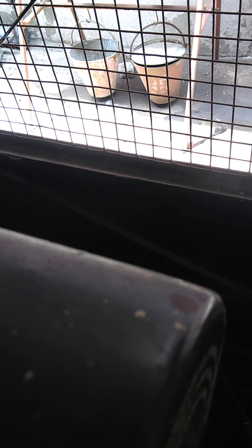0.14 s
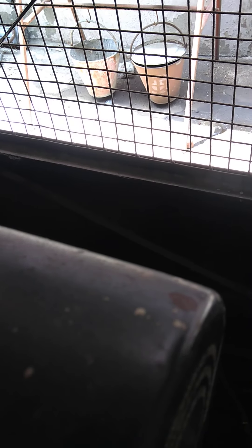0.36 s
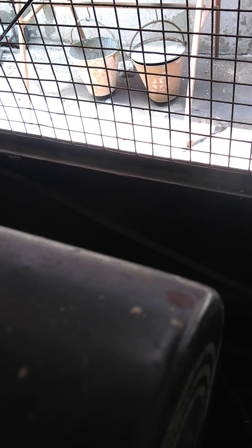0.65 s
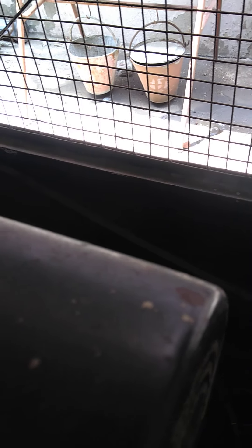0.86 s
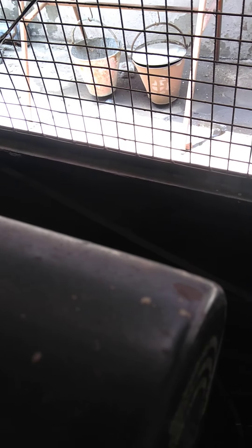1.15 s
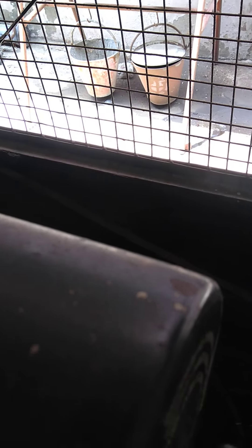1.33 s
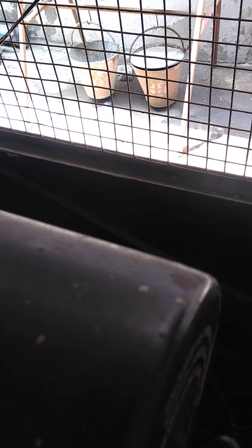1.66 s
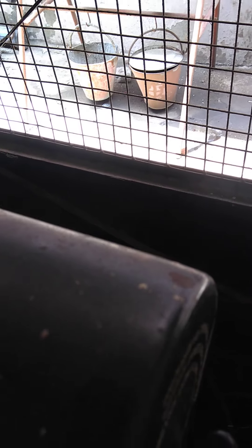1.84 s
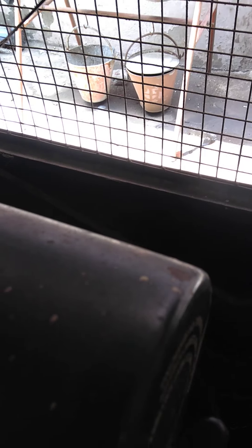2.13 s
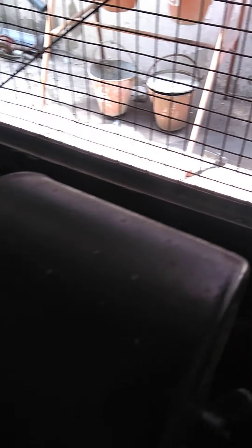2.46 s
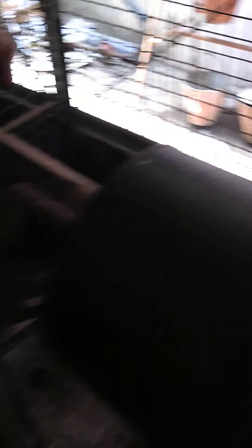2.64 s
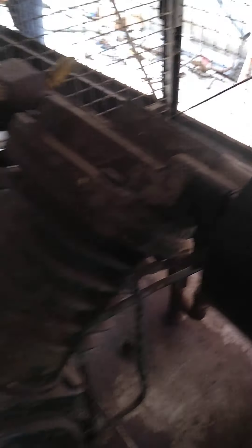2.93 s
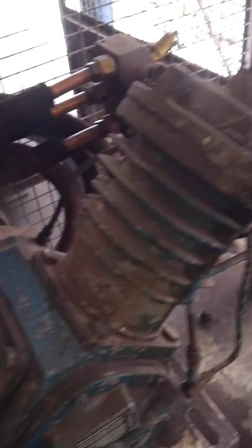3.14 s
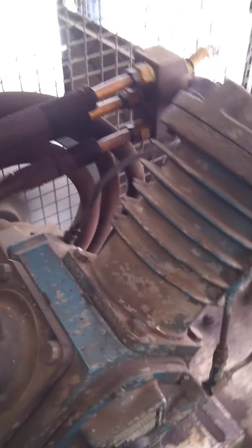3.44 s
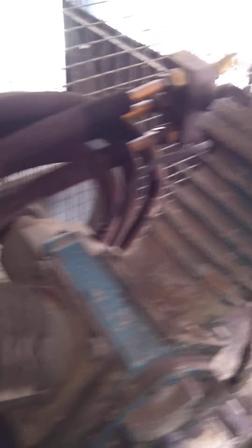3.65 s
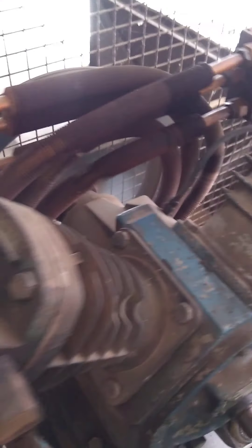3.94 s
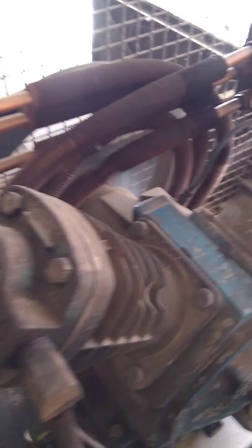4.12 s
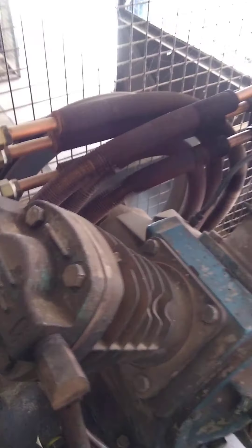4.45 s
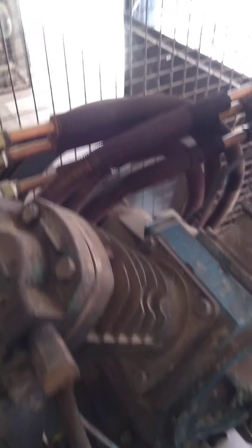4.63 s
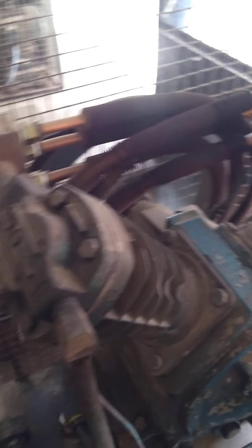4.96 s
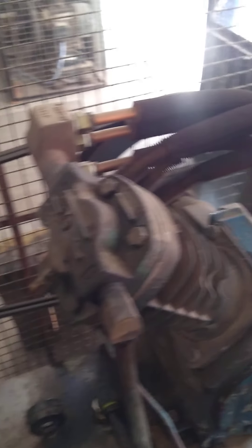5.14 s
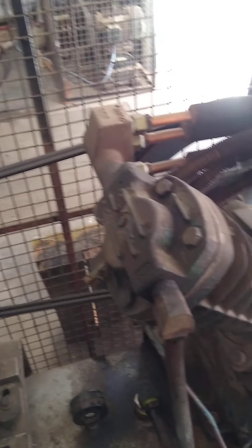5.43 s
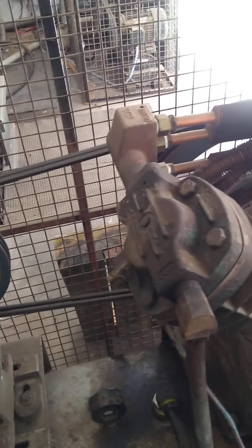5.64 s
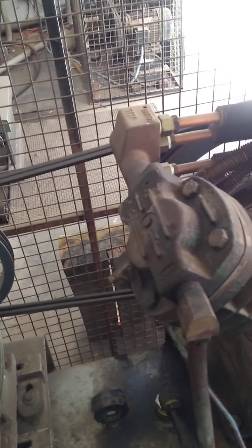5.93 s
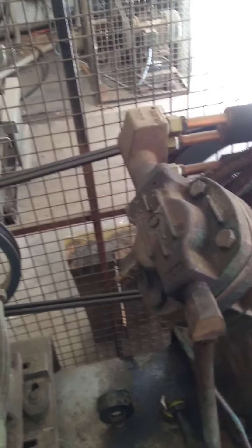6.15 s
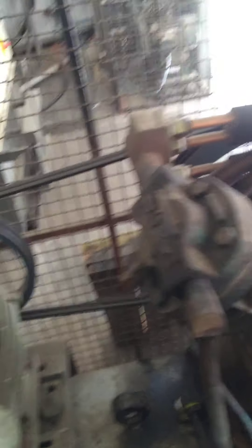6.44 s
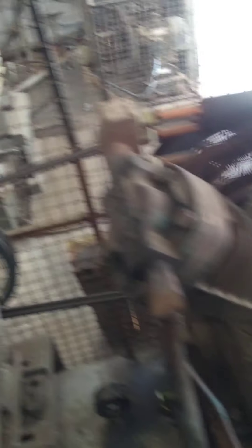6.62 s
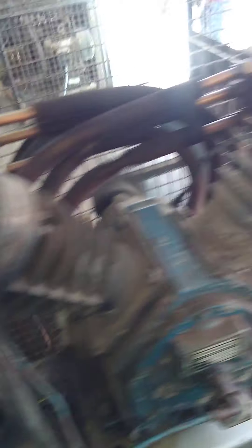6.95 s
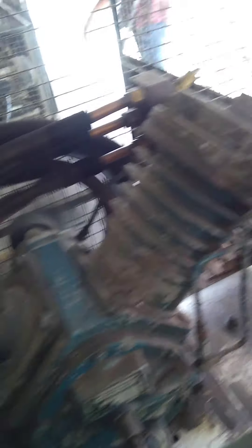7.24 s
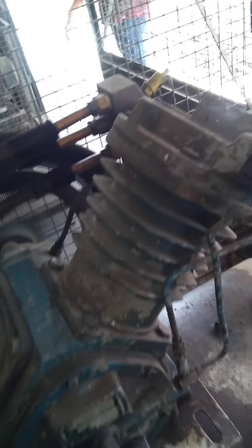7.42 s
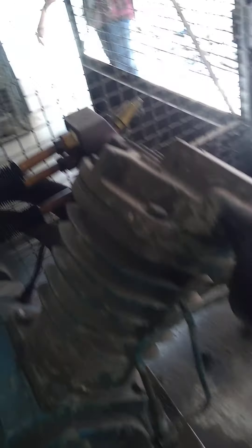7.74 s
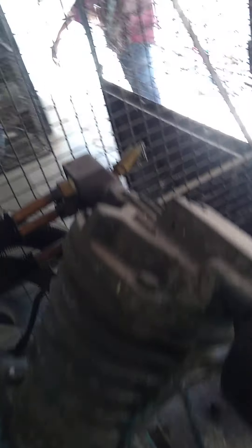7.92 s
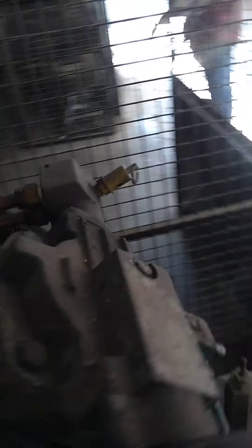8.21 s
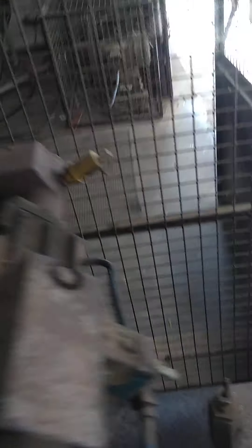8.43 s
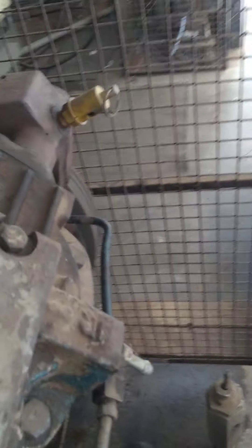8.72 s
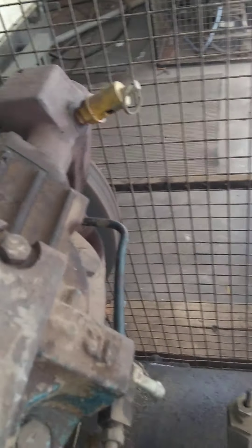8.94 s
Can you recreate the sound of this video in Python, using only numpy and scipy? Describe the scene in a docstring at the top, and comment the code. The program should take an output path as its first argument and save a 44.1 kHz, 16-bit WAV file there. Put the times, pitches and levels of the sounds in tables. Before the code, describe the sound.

An air compressor is already running and never stops or changes speed: a dense, rapid throb of almost sixteen turns a second, heard very close in a workshop. From 0 to about 2.5 seconds the microphone is by the motor: bassy thudding, softer knocks, only faint air hiss and a barely audible thin electrical whine. Around 2.5 to 4 seconds it moves past the first cylinder, and hollow metallic ringing, valve clatter and breathy pulses of air come forward. From 4 to 6.5 seconds, by the second cylinder, it is loudest and harshest, with hard knocking, fuller rushing air, small spits and a very high fluttering squeak. From 6.5 to 8.3 seconds it swings back, the clatter and hiss receding. After about 8.5 seconds the cylinder head shades the sound, dulling the knocks, and the low throb continues to the end at about 9 seconds.

```python
"""A steady throb of thuds and knocks, near 16 a second: a belt-driven twin-cylinder air compressor in a workshop.
Each turn brings two intake puffs and a head knock (ringing resonances summed as crank harmonics), valve clatter
and taps (noise bursts), a swell of rushing air with a spit (shaped noise) and a squeak (a wavering sine).
A thin sine whine marks the motor. The microphone starts beside the motor, is carried past the first cylinder
to the second, and back; at the end the cylinder head shades the sound."""
import sys
import numpy as np
from scipy import signal
from scipy.fft import rfft, irfft, next_fast_len
from scipy.io import wavfile
from scipy.ndimage import uniform_filter1d, map_coordinates

SR = 44100
rng = np.random.default_rng(int(sys.argv[2]) if len(sys.argv) > 2 else 0)


def master(y):
    """Save y as 16-bit WAV."""
    cut = np.clip(np.atleast_2d(y).T, -1, 1)
    pcm = np.round(cut * 32767)  # scale
    wavfile.write(sys.argv[1], SR, pcm.astype(np.int16))


N = 400428

# "place" is the microphone's position: 0 by the motor, 1 at the first cylinder, 2 at the second
# spectra give relative level per Hz; noise() sets the overall rms

# body rumble under the thud: f/Hz, level/dB
RUMBLE_SPECTRUM = [(20, -23), (45, -36), (80, -8), (150, -9), (260, -5), (450, -3), (600, -9.5), (900, -31)]
# rattle under the knock: f/Hz, level/dB
RATTLE_SPECTRUM = [(300, -16), (500, -4.5), (800, -3), (950, -27), (1300, -37)]
# loose ringing of the castings under the strokes: f/Hz, level/dB
CASTINGS_SPECTRUM = [(380, -8), (430, 6), (450, 3), (500, -2), (570, -3), (620, 4), (690, -3), (750, 3),
                     (830, -5)]
RUMBLE_MOTOR_DB, RUMBLE_SECOND_DB = -13, -12  # against the thud
RATTLE_DB = -9.5  # against the knock
CASTINGS_DB = -25.5


def pistons(turns, place, thud_db, knock_db, left_db):
    """Intake puffs and head knocks, with a little rumble, rattle and ringing that never repeats."""
    thud, knock = beat(turns, place)
    # the body shakes hardest just after the main stroke
    shake = swell(turns, centre=.22, width=.15, depth_db=5)
    rumble_db = np.interp(place, [0, 2], [RUMBLE_MOTOR_DB, RUMBLE_SECOND_DB])
    thud = thud + from_db(rumble_db) * noise(RUMBLE_SPECTRUM) * shake
    knock = knock + from_db(RATTLE_DB) * noise(RATTLE_SPECTRUM) * shake
    # silent right by the motor, full from the first cylinder on
    ringing = from_db(CASTINGS_DB) * np.minimum(place, 1) * noise(CASTINGS_SPECTRUM) * shake
    low = panned(thud * from_db(thud_db - 1.0) + ringing, left_db + 0.3)
    high = panned(knock, left_db + 1.5) * from_db(knock_db - 1.37)
    return low + high


# stereo width of the beat: f/Hz, side minus mid level/dB
BEAT_WIDTH = [(60, -15), (100, 10.5), (160, -6), (260, -7.5), (500, -6.5), (950, -12)]


def beat(turns, place):
    """The thud (below 500 Hz) and knock (above), summed from each turn's harmonics, each band at rms 1."""
    turn_starts = np.searchsorted(turns, np.arange(int(turns[-1]) + 2))
    at = np.minimum(turn_starts, N - 1)
    hidden = shade()[at]
    # mix of the three places, plus a fourth: behind the head
    by_place = [np.maximum(1 - abs(place[at] - k), 0) * (1 - hidden) for k in range(3)]
    shares = np.transpose(by_place + [hidden])
    multiple, mid = turn_harmonics(shares, at / SR)
    hz = multiple * TURNS_PER_S
    side_phase = np.exp(.7j * rng.standard_normal(len(hz)))
    side = 1j * mid * from_db(at_hz(BEAT_WIDTH, hz)) * side_phase
    cycle = np.exp(2j * np.pi * np.outer(multiple, np.linspace(0, 1, turn_size() + 1)))
    parts = []
    for band in (hz < 500, hz >= 500):
        power = uniform_filter1d(np.sum(abs(mid * band) ** 2, axis=1) / 2, size=4)
        waves = (stereo(mid, side) * band / np.sqrt(power)[:, None] @ cycle).real
        # each turn's waveform glides into the next
        position = [turns, turns % 1 * turn_size()]
        parts.append([map_coordinates(w, position, order=1) for w in waves])
    return np.array(parts)


# standing-wave loud spots the microphone passes: t/s, 1/e half length/s, f/Hz, lift level/dB
LOUD_SPOTS_PASSED = [(4.003, 0.73, 786, 14.5), (4.093, 0.24, 533, 14.5), (6.253, 0.35, 437, 4.5),
                     (6.893, 0.23, 648, 11.5)]
# shifting reflections against the direct beat: f/Hz, share
SHIFTING_REFLECTIONS = [(200, .09), (300, .11), (450, .18), (1000, .16)]
# steady reflections against the direct beat: share at motor, first cylinder, second, behind the head
STEADY_REFLECTIONS = [0.15, 0.5, 0.45, 0.08]
# ringing-on of pipes and walls after a stroke: share at the same four places
RING_ON_SHARE = [.3, .8, .8, .3]
STROKE_SPREAD_DB, STROKE_SPREAD_TURN = .6, .0009  # no two strokes are alike: strength and timing


def turn_harmonics(shares, s):
    """Strokes set the timing of each turn, pipes and walls the strength; both glide from place to place."""
    place_colours = (MOTOR_COLOUR, FIRST_COLOUR, SECOND_COLOUR, MOTOR_COLOUR)
    colours = np.array([crank_harmonics(c, index=k) for k, c in enumerate(place_colours)])
    multiple = colours[0, :, 0]
    hz = multiple * TURNS_PER_S
    level_db = shares @ colours[:, :, 1]
    for at, half_s, spot_hz, db in LOUD_SPOTS_PASSED:
        distance = ((s[:, None] - at) / half_s) ** 2 + ((hz - spot_hz) / 20) ** 2
        level_db = level_db + db * np.exp(-distance)
    motor_db, first_db, second_db = np.transpose(STROKE_RESONANCES)[-3:]
    stroke_db = shares @ np.array([motor_db, first_db, second_db, motor_db])
    stronger, later = rng.standard_normal((2, *stroke_db.shape))
    even = strokes(multiple, stroke_db, 0 * later)
    uneven = strokes(multiple, stroke_db + STROKE_SPREAD_DB * stronger, STROKE_SPREAD_TURN * later)
    strength = np.sqrt(uniform_filter1d(abs(even) ** 2, size=7))
    reflections = (shares @ np.diag(STEADY_REFLECTIONS)) @ scatter(len(STEADY_REFLECTIONS), len(hz))
    heard = even + strength * reflections
    # smoothed twice over nine turns, so these reflections shift slowly
    shifting = uniform_filter1d(scatter(len(s), len(hz)), size=9, axis=0)
    shifting = uniform_filter1d(shifting, size=9, axis=0)
    change = (uneven - even) / strength
    change = change + at_hz(SHIFTING_REFLECTIONS, hz) * shifting / shifting.std()
    lag = (shares @ RING_ON_SHARE)[:, None] * ring_on(level_db, heard)
    timing = np.exp(1j * np.angle(heard)) + change
    return multiple, from_db(level_db) * np.exp(1j * lag) * timing


# strokes: time/turn, ring f/Hz, ring width/Hz, level/dB by the motor, at the first cylinder, at the second
STROKE_RESONANCES = [(0.08, 282, 390, 6, -11.5, -12.5), (.085, 316, 182, -10.5, -4.5, -5.5),
                     (0.204, 370, 191, -5.5, -4.5, -4.5), (0.539, 289, 412, 3.5, -11.5, -13),
                     (0.562, 275.4, 66, -35, 3, 1), (.162, 789, 270, -6.5, -7, -4),
                     (.37, 656, 350, -18, -8, -7.5), (0.601, 778, 252, -17, -12.5, -12),
                     (.79, 700, 417, -10, -15, -13.5)]


def strokes(multiple, stroke_db, late):
    """Each stroke excites a damped resonance, applied twice; harmonics come out one row per turn."""
    hz, total = multiple * TURNS_PER_S, 0
    for k, (share, ring_hz, width_hz, *_) in enumerate(STROKE_RESONANCES):
        resonance = 1 / (1 + 1j * (hz ** 2 - ring_hz ** 2) / (hz * width_hz))
        delay = np.exp(-2j * np.pi * multiple * (share + late[:, [k]]))
        total = total + from_db(stroke_db[:, [k]]) * resonance ** 2 * delay
    return total


# colour of the beat by the motor, before standing waves: f/Hz, level/dB per harmonic
MOTOR_COLOUR = [(63, -27), (128, -12.5), (158, -10), (185, -14.5), (228, -9.5), (262, -6.5), (365, -12),
                (415, -7), (560, -10), (630, -28.5), (715, -19), (770, -11.5), (860, -10.5), (950, -29),
                (1070, -21)]
# the same at the first cylinder: f/Hz, level/dB per harmonic
FIRST_COLOUR = [(63, -20.5), (125, -22), (160, -6.5), (200, -3), (235, -22), (265, -6.5), (330, -9.5),
                (425, -12), (490, -5.5), (600, -15), (755, -7.5), (950, -9.5), (1070, -13.5)]
# the same at the second cylinder: f/Hz, level/dB per harmonic
SECOND_COLOUR = [(63, -23), (100, -37), (160, -6), (200, 1.5), (240, -12.5), (315, 3), (385, -5),
                 (450, -6.5), (510, -7.5), (595, -10), (640, -5.5), (710, -15), (790, 3.5), (950, -21),
                 (1070, -18)]
# standing waves: crank multiple, lift level/dB by the motor, at the first cylinder, second, behind the head
STANDING_WAVES = [(11, 2, -5, -10, 6), (12, -3.5, -1.5, -2.5, 3), (14, -2.5, 7.5, -6, 4),
                  (16, 4.5, 8, 3.5, 0.5), (17, 7.5, 7.5, -5.5, 7), (18, 3, 8.5, -3, 3),
                  (21, 6.5, -5, -1.5, 2), (22, 4, -5, -45, 4), (23, -1, 1, 1, -2),
                  (24, -5.5, 7.5, -42, -13), (27, 2.5, 4.5, 2, 0.5), (28, -13, 4.5, 5, -14),
                  (30, 6, -28, 9, 0), (31, -40, -13, 3.5, -6), (35, 3.5, 7, -8, -21), (36, 3.5, -7, -14, 2),
                  (37, -20, 1, 2.5, -11), (38, 10, -3, -13, 13), (41, -29, 6.5, -0.5, 2), (42, 0, 5, 4, 20),
                  (43, 10.5, 4, -1.5, 0), (45, -2, -17, -8, 4), (47, 4.5, -2, 5.5, 7),
                  (50, -21, -14, -5, 4), (51, 4, 5, -1, -6), (52, 2.5, -13, -2, -3), (53, -29, -2, 2, -17),
                  (54, 4, -5, 1, 3.5), (55, 8, 7, 13.5, -9), (58, -10, -1, 11, -3), (61, -13, -3, 12, 0)]
# the two puffs, half a turn apart, cancel the odd harmonics in the bass
CANCEL_HZ, CANCEL_WIDTH_HZ, CANCEL_DB = 126, 43, -26


def crank_harmonics(colour, index):
    """Crank multiples and their dB at one place: colour, weak odd bass, standing waves."""
    multiple = np.arange(4, 69)
    hz = multiple * TURNS_PER_S
    cancel_db = CANCEL_DB * np.exp(-((hz - CANCEL_HZ) / CANCEL_WIDTH_HZ) ** 2)
    level_db = at_hz(colour, hz) + multiple % 2 * cancel_db
    for k, *lift_db in STANDING_WAVES:
        level_db = level_db + (multiple == round(k)) * lift_db[index]
    return np.transpose([multiple, level_db])


def ring_on(level_db, heard):
    """Phase lag of the pipes and walls that colour the strokes: their ringing follows each stroke."""
    lift_db = level_db - 20 * np.log10(abs(heard) + 1e-9)
    lift_db = np.clip(lift_db - np.median(lift_db, axis=1, keepdims=True), -12, 12)
    broad_db = uniform_filter1d(lift_db, size=3, axis=1)
    # the Hilbert transform of log gain gives the lag
    mirrored = np.hstack([broad_db, broad_db[:, ::-1]]) * np.log(10) / 20
    return -signal.hilbert(mirrored, axis=1).imag[:, :heard.shape[1]]


# rush of air through the valves: f/Hz, level/dB
AIR_SPECTRUM = [(1600, -0.5), (2200, 4), (2600, 5), (3000, 4), (3700, 2), (4600, 3), (5800, -2.9),
                (6600, -3.5), (8400, -8), (9500, -7.5), (11600, -58), (12800, -16), (15000, -22.5)]
# flow over a turn, gliding from point to point, before its swing is scaled by place: time/turn, level/dB
AIR_FLOW = [(0, -.7), (.12, 2), (.22, 4), (.32, 5.3), (.48, 3.3), (.6, 0.3), (.75, -2), (.91, -1.6)]
# bright hiss that swells smoothly with the main air puff: f/Hz, level/dB
JET_SPECTRUM = [(3500, -18), (6000, 10.5), (9000, 0.5), (11500, 3), (14000, -18)]
SHADE_SQUEAK_DB = -8


def air(turns, near, air_db):
    """Valve air in uneven puffs, brightest near full flow; near the cylinders they fill each other's gaps."""
    share, cycle_db = np.transpose(AIR_FLOW)
    swing = 1.16 - 0.88 * near
    flow = from_db(np.interp(turns % 1, share, cycle_db, period=1) * swing + .5 * drift(21))
    turbulence = from_db(.8 * drift(120))
    rush = noise(AIR_SPECTRUM) * flow / np.sqrt(np.mean(flow ** 2))
    puff = swell(turns, centre=.29, width=.18, depth_db=12)
    jet = noise(JET_SPECTRUM) * puff * from_db(-9.5 + 1.3 * drift(25))
    squeak_db = -18.5 + 2 * near + SHADE_SQUEAK_DB * shade()
    hiss = (rush + jet) * turbulence
    return (hiss + spit(turns, near) + squeak(turns) * from_db(squeak_db)) * from_db(air_db - 0.59)


# ringing plate of the second valve: f/Hz, level/dB
SPIT_SPECTRUM = [(3600, 0.5), (4700, -6), (5300, 0.5), (5700, 0), (6100, 1.5), (6900, -23), (7700, -34),
                 (8500, 0.5), (9600, -21), (11800, -16), (14000, -26)]
SPIT_START, SPIT_DECAY = .795, .085  # in turns
SPIT_DB, SPIT_NEAR_DB = -9, -3  # against the air; the second is added toward the second cylinder


def spit(turns, near):
    """Late in the turn a second valve snaps open and spits through its ringing plate."""
    opening = strike(turns + .007 * drift(15), SPIT_START, SPIT_DECAY)
    level_db = SPIT_DB + SPIT_NEAR_DB * near + 1.2 * drift(25)
    return noise(SPIT_SPECTRUM) * opening * from_db(level_db)


# breathy edge of the valve squeak: f/Hz, level/dB
SQUEAK_SPECTRUM = [(9500, -34), (11000, -3), (11700, -9), (12200, -17), (13500, -30)]
# the pitch wanders from turn to turn and flutters faster, separately in each channel
SQUEAK_HZ, SQUEAK_SCATTER_HZ, SQUEAK_FLUTTER_HZ = 11650, 130, 100


def squeak(turns):
    """A brief, fluttering sine whistle with a breathy noise edge as the valve opens."""
    pitch = SQUEAK_HZ + SQUEAK_SCATTER_HZ * drift(14)
    flutter = [SQUEAK_FLUTTER_HZ * drift(150) for _ in range(2)]
    whistle = np.sin(2 * np.pi * np.cumsum(pitch + np.array(flutter), axis=1) / SR)
    sound = rms_one(panned(whistle, left_db=-7))
    sound = rms_one(sound + from_db(-3) * noise(SQUEAK_SPECTRUM))
    opening = swell(turns + .007 * drift(10), centre=.105, width=.058, depth_db=17)
    return sound * opening * from_db(1.7 * drift(12))


# clatter of valve plates and bearings: f/Hz, level/dB
CLATTER_SPECTRUM = [(750, -14), (950, 1), (1100, 2), (1250, -4.5), (1600, -5.5), (1900, -11), (2300, -11),
                    (2800, -35)]


def valve_gear(turns, near, clatter_db):
    """Valve plates and bearings clatter, partly alike each turn; more evenly toward the second cylinder."""
    repeating = every_turn(noise(CLATTER_SPECTRUM, size=turn_size()), turns)
    clatter = from_db(-5.5) * repeating + from_db(-0.5) * noise(CLATTER_SPECTRUM)
    pulse = swell(turns, centre=0.37, width=0.091, depth_db=1.9 * (2 - near))
    return clatter * pulse * from_db(clatter_db)


# taps: start/turn, decay/turn, level/dB by the motor, at the first cylinder, at the second, behind the head
TAP_TIMES = [(.07, .025, -60, -37, -37.5, -42), (0.178, 0.033, -49, -37.5, -38.5, -43),
             (.55, .015, -58, -44, -54, -46), (.81, .03, -50, -56, -45, -48)]
# what the taps ring with: f/Hz, level/dB
TAP_SPECTRUM = [(750, 1), (1000, -1), (1250, -7), (1600, -5.5), (2100, -22)]


def taps(turns, place):
    """Pins and valve plates tap at fixed points of the turn, each time a little differently."""
    ring = rms_one(every_turn(noise(TAP_SPECTRUM, size=turn_size()), turns) + noise(TAP_SPECTRUM))
    hidden, gain = shade(), 0
    for start, decay, *by_place, behind_db in TAP_TIMES:
        level_db = np.interp(place, [0, 1, 2], by_place) * (1 - hidden) + behind_db * hidden
        gain = gain + strike(turns, start, decay) * from_db(level_db)
    return ring * gain * from_db(1.2 * drift(20))


# steady thin tones of the motor, before wavering and distance: f/Hz, level/dB
MOTOR_WHINE = [(4900, -51)]


def motor(t):
    """A thin electrical whine: sines whose level wavers separately in each channel."""
    channels = np.zeros((2, N))
    for channel in channels:
        for hz, db in MOTOR_WHINE:
            phase = rng.uniform(0, 2 * np.pi)
            channel += from_db(db + 3.3 * drift(1.5)) * np.sin(2 * np.pi * hz * t + phase)
    return channels


# levels before layer trims: place, level/dB of thud, knock, clatter, air, then beat left minus right/dB
PLACE_LEVELS = [(0, -18, -24.5, -36, -38, 1.3), (1, -19, -22.5, -29.5, -31.5, 1.5),
                (2, -18, -18.5, -28.5, -31, 1.5)]
SHADE_KNOCK_DB, SHADE_THUD_DB, SHADE_LEFT_DB = -4, -0.7, 2.5


def loudness(place):
    """Thud, knock, clatter, air and balance in dB follow the microphone's place and the shade of the head."""
    at, *columns = np.transpose(PLACE_LEVELS)
    thud_db, knock_db, clatter_db, air_db, left_db = [np.interp(place, at, c) for c in columns]
    hidden = shade()
    thud_db = thud_db + SHADE_THUD_DB * hidden
    knock_db = knock_db + SHADE_KNOCK_DB * hidden
    return thud_db, knock_db, clatter_db, air_db, left_db + SHADE_LEFT_DB * hidden


def shade():
    """The cylinder head comes between at 8.53 s, in one step from 0 to 1."""
    return (np.arange(N) / SR > 8.53).astype(float)


# crankshaft speed: t/s, rate/(turns per s)
CRANK_SPEED = [(0, 15.795), (3, 15.792), (6.5, 15.790), (9.1, 15.799)]
TURNS_PER_S = CRANK_SPEED[0][1]
START_TURN = .517


def crank():
    """Turns made so far: the belt drives the crank a little unevenly."""
    speed, = in_time(CRANK_SPEED)
    return START_TURN + np.cumsum(speed) / SR + 0.00057 * drift(6.4)


# microphone path: t/s, place
MICROPHONE_PATH = [(0, 0.11), (2.45, 0.14), (2.75, 0.53), (3.05, 0.47), (3.5, 1.14), (3.7, 0.85),
                   (4.05, 1.8), (6.45, 1.96), (7.2, 1.16), (7.8, 0.87), (8.25, 0.43), (9.08, 0.058)]


def microphone_place():
    """The microphone's place at each sample, 0 to 2."""
    place, = in_time(MICROPHONE_PATH)
    return np.clip(place, 0, 2)


# how closely the two channels are related, before the port pattern: f/Hz, coherence
CHANNEL_COHERENCE = [(40, .05), (150, .3), (300, .8), (800, .8), (1100, .96), (2100, .999), (2400, .999),
                     (3400, .88), (5600, .75), (9000, .5), (15000, .35)]
# the left channel is the duller one: f/Hz, left minus right level/dB
CHANNEL_TILT = [(2600, 0), (4000, -1.3), (8000, -3), (12000, -3)]
PORT_HZ = 2250  # the spacing of the microphone ports opposes the channels at multiples of this pitch


def noise(spectrum, size=N):
    """Stereo noise of a given colour, falling steeply outside its table; mid at rms 1."""
    # one turn stays unpadded so that it loops
    padded = next_fast_len(size) if size == N else size
    hz = np.fft.rfftfreq(padded, 1 / SR)
    comb = np.where(hz < PORT_HZ / 2, 1, -np.cos(2 * np.pi * hz / PORT_HZ))
    alike = np.clip(at_hz(CHANNEL_COHERENCE, hz), 0, 1) * comb
    lowest_hz, highest_hz = spectrum[0][0], spectrum[-1][0]
    falloff = 1 + (hz / highest_hz / 1.2) ** 12 + (lowest_hz / 1.2 / (hz + 1)) ** 8
    gain = from_db(at_hz(spectrum, hz)) / falloff
    mid, side = rfft(rng.standard_normal((2, padded))) * gain
    pair = stereo(np.sqrt(1 + alike) * mid, np.sqrt(1 - alike) * side)
    return rms_one(irfft(panned(pair, at_hz(CHANNEL_TILT, hz)), padded)[:, :size])


def swell(turns, centre, width, depth_db):
    """A smooth rise of level once a turn, centre and width in turns; rms 1."""
    shape = np.exp((np.cos(2 * np.pi * (turns - centre)) - 1) / (2 * np.pi * width) ** 2)
    gain = from_db(depth_db * shape)
    return gain / np.sqrt(np.mean(gain ** 2))


def strike(turns, start, decay):
    """A quick rise and a dying tail once a turn, times in turns; rms 1."""
    age = (turns - start) % 1
    gain = np.exp(-age / max(decay, .004)) * (1 - np.exp(-age / .02))
    return gain / np.sqrt(np.mean(gain ** 2))


def turn_size():
    """Samples in one turn of the crank, an even number."""
    return 2 * round(SR / TURNS_PER_S / 2)


def every_turn(wave, turns):
    """Play the sound of one turn in step with the crank."""
    position = turns % 1 * wave.shape[1]
    return np.array([np.interp(position, np.arange(len(w) + 1), np.append(w, w[0])) for w in wave])


def scatter(*size):
    """Reflections from all around: a random strength and phase for each harmonic."""
    return rng.standard_normal((*size, 2)) @ np.array([1, 1j]) / np.sqrt(2)


def drift(rate):
    """Smooth random wandering with spread 1, rolled off above the rate in Hz."""
    hz = np.fft.rfftfreq(N // 100, 100 / SR)
    slow = irfft(rfft(rng.standard_normal(N // 100)) / (1 + (hz / rate) ** 2))
    return np.interp(np.linspace(0, len(slow) - 1, N), np.arange(len(slow)), slow / slow.std())


def panned(x, left_db):
    """Tilt a stereo sound to the left."""
    return x * from_db(np.array([[1], [-1]]) * left_db / 2)


def stereo(mid, side):
    """Left and right from mid and side."""
    return np.array([mid + side, mid - side])


def rms_one(x):
    """Scale so that the mean of both channels has rms 1."""
    return x / np.sqrt(np.mean(x.mean(axis=0) ** 2) + 1e-20)


def from_db(db):
    """Decibels to gain."""
    return 10 ** (np.asarray(db) / 20)


def in_time(rows):
    """One curve per column, sample by sample."""
    s, *columns = np.transpose(rows)
    return [np.interp(np.arange(N) / SR, s, c) for c in columns]


def at_hz(points, hz):
    """Read a table on a log-frequency axis."""
    f, value = np.transpose(points)
    return np.interp(np.log(np.maximum(hz, 1)), np.log(f), value)


def scene():
    """All layers but the motor whine follow the crank; their levels follow the microphone."""
    turns = crank()
    place = microphone_place()
    near = place / 2  # 0 by the motor, 1 at the second cylinder
    thud_db, knock_db, clatter_db, air_db, left_db = loudness(place)
    mix = pistons(turns, place, thud_db, knock_db, left_db)
    mix = mix + air(turns, near, air_db)
    mix = mix + valve_gear(turns, near, clatter_db) + taps(turns, place)
    return mix + (1 - near) * motor(np.arange(N) / SR)


CUTOFF_HZ = 15300


def record(dry):
    """The highest peaks are rounded off; the top is cut by a steep low-pass."""
    rounded = dry / (1 + (dry / .9) ** 8) ** (1 / 8)
    low_pass = signal.ellip(10, .2, 80, CUTOFF_HZ, fs=SR, output="sos")
    return signal.sosfilt(low_pass, rounded)


dry = scene()
out = record(dry)
master(out)
```